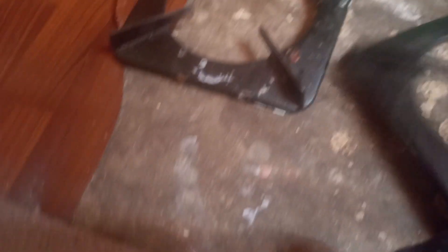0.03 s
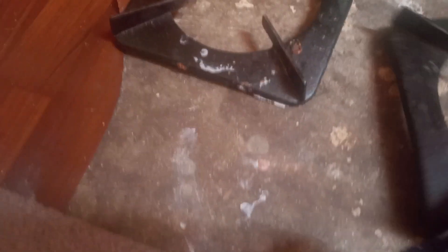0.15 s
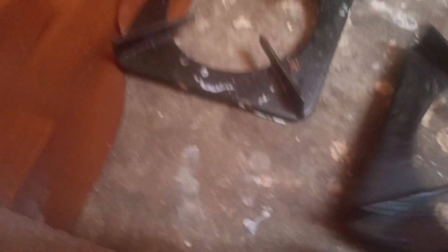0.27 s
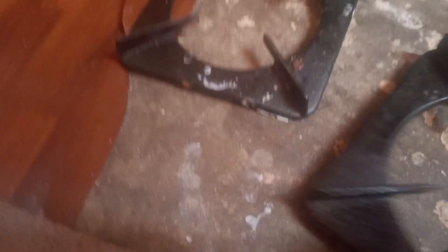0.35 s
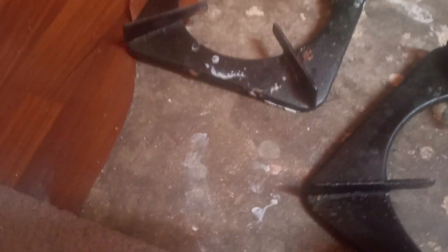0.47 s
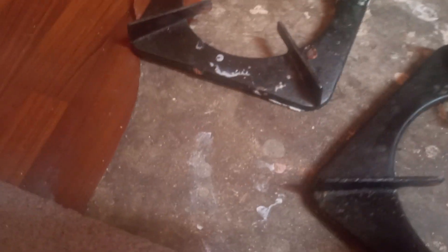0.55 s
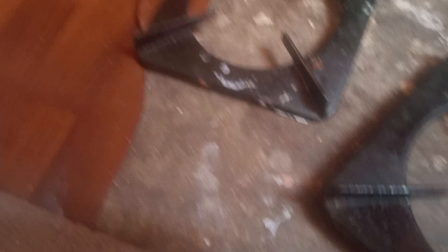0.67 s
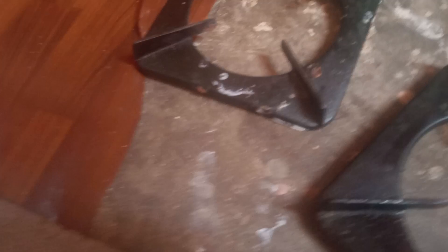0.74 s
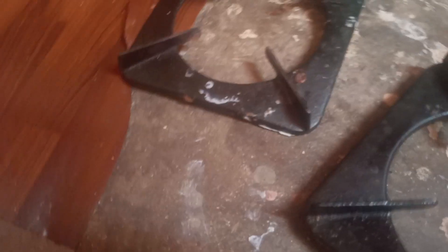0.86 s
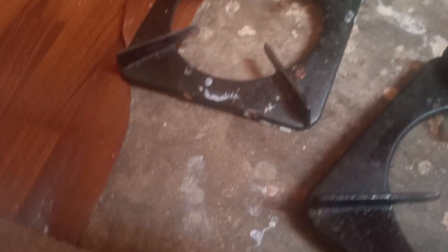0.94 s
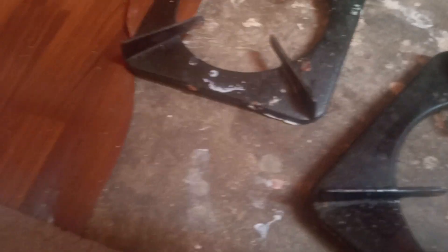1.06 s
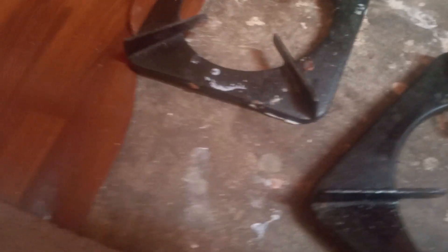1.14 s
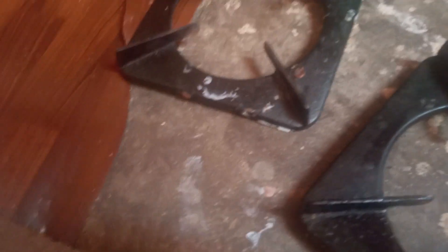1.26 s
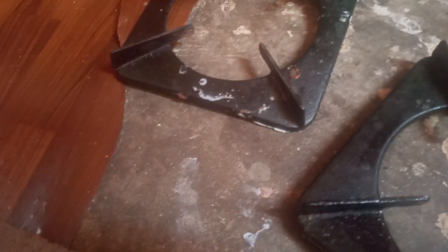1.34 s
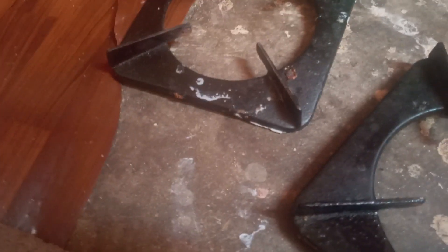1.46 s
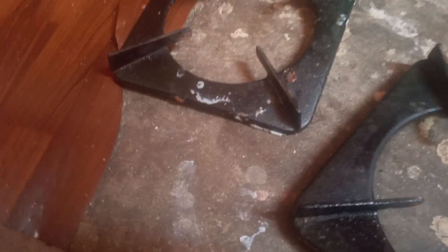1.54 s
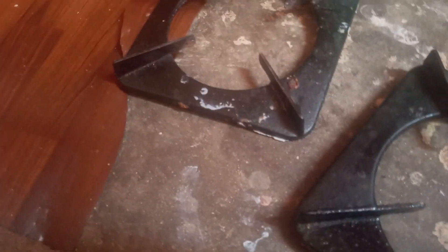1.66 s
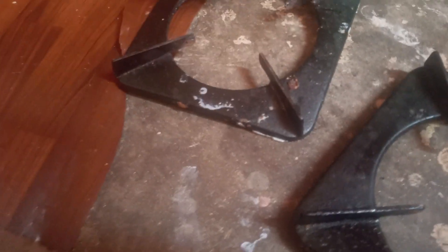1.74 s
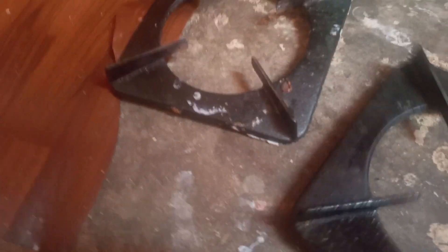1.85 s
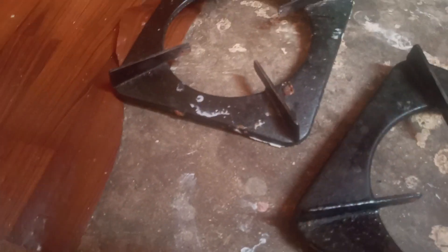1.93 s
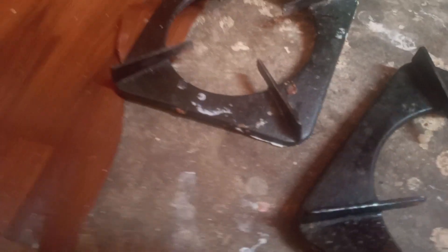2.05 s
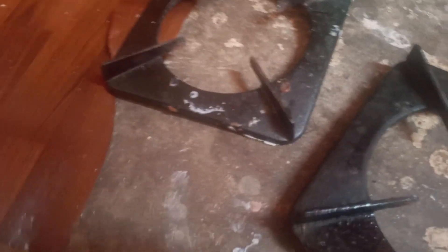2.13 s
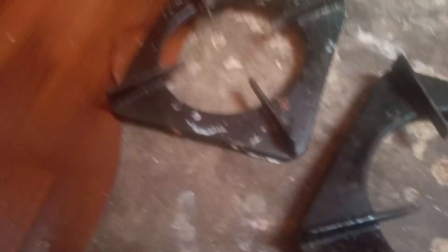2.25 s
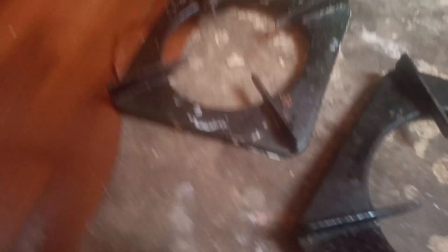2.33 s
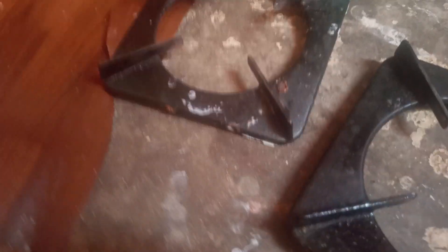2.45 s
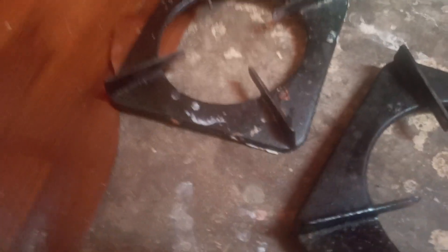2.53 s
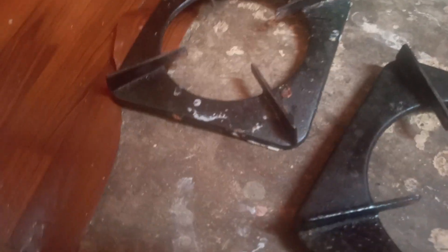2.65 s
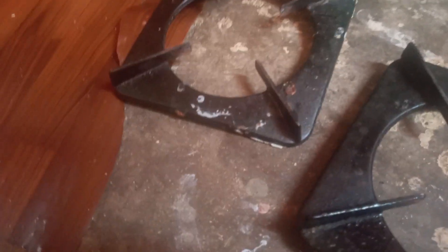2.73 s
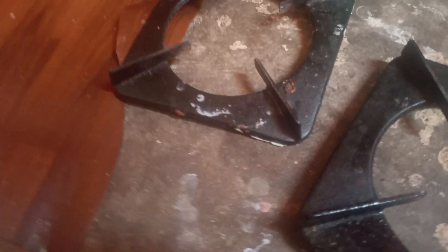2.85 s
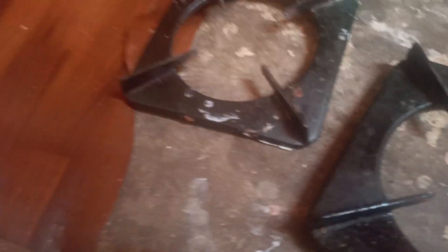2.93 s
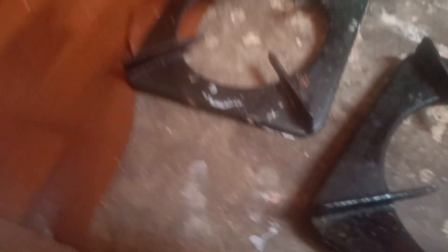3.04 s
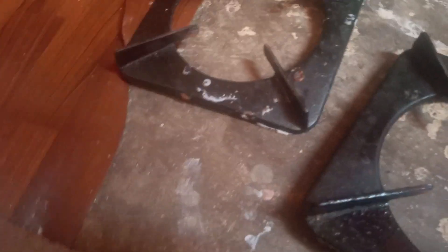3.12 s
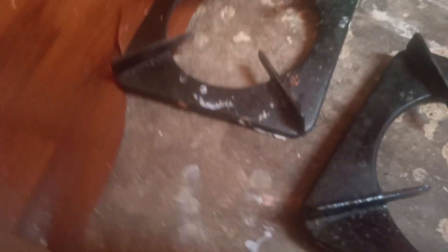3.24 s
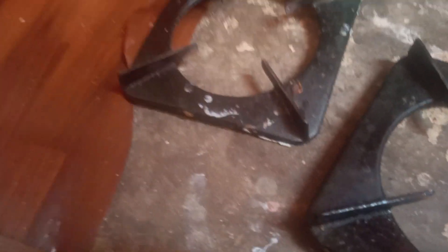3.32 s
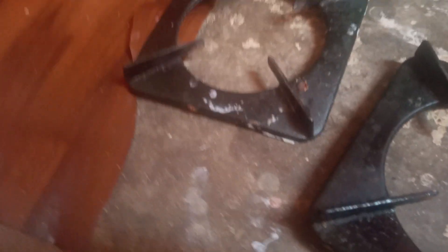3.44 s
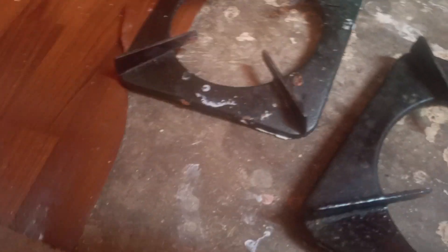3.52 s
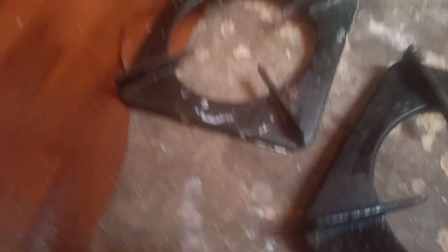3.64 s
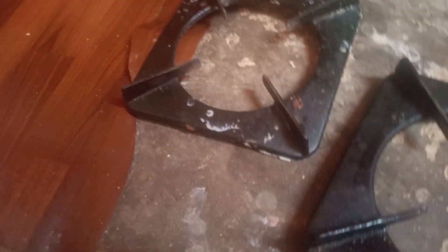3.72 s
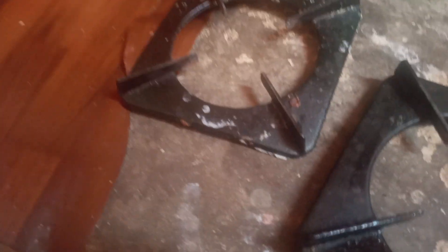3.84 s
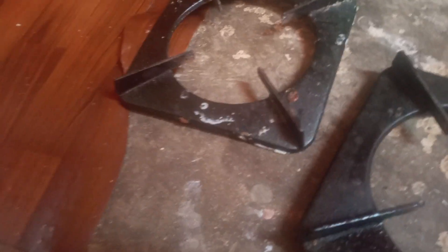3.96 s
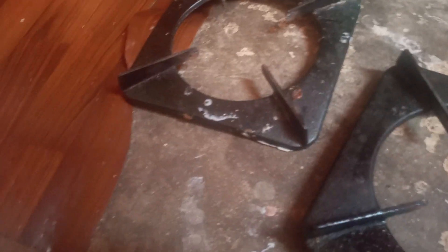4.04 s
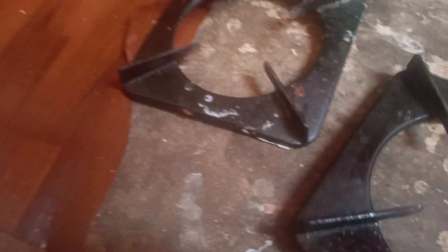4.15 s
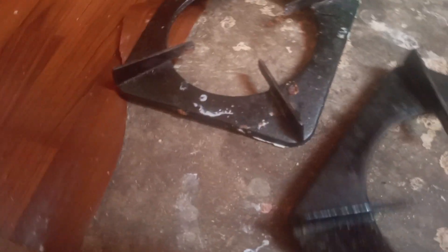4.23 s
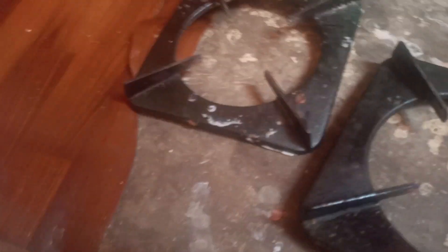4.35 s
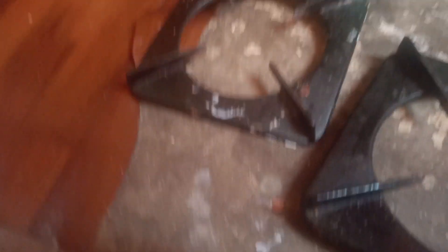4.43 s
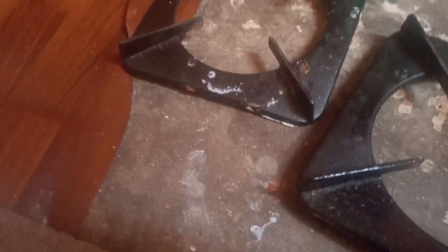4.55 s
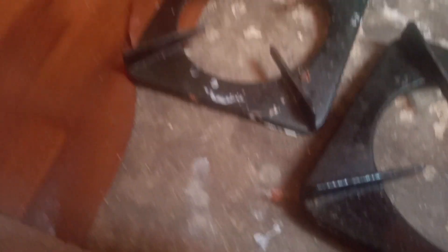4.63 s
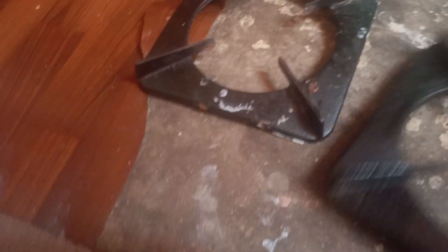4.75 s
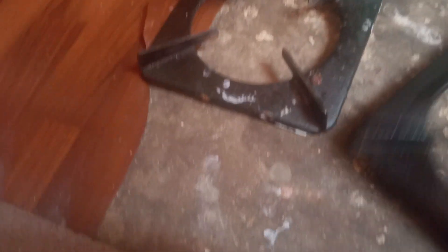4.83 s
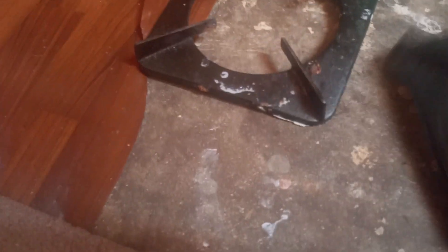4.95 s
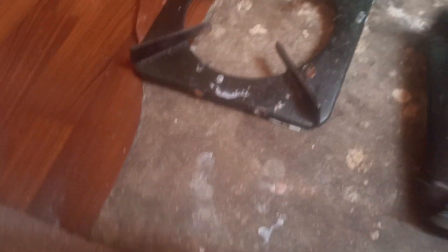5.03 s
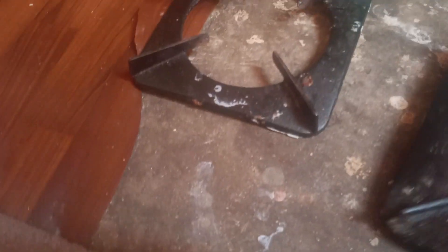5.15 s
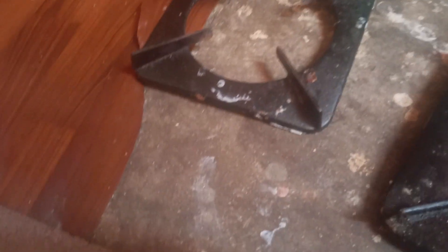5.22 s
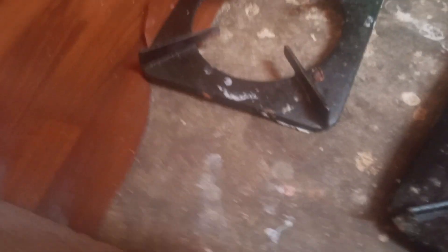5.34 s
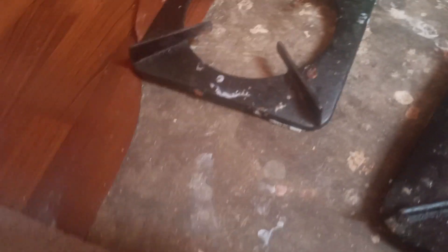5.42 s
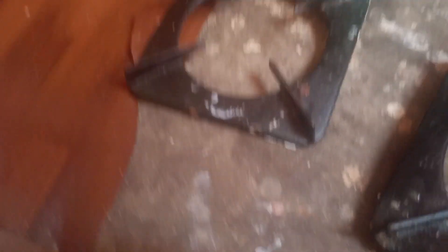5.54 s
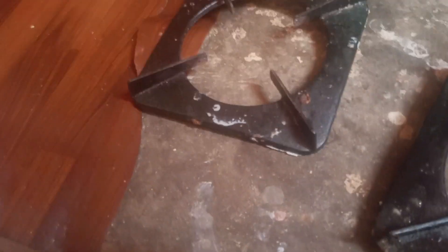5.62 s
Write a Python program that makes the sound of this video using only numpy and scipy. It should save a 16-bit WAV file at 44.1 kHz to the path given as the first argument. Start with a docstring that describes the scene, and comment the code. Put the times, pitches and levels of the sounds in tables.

```python
"""An iron pan support is dragged over a gritty hard floor, set down, scrubbed with a wet brush and dragged away.
Floor and brush excite the same modes of the iron with different strengths: sliding feet and faint handling rubs
by stick and slip, knocks by short bursts of contact, bristles by dense tiny slips that also hiss.
The close sound has a short dull echo; a low room rumble, a low tone and a faint hiss lie below."""
import sys
import numpy as np
from scipy import signal
from scipy.fft import rfft, irfft
from scipy.io import wavfile
from scipy.ndimage import uniform_filter1d

SR = 44100
rng = np.random.default_rng(int(sys.argv[2]) if len(sys.argv) > 2 else 0)


def digitize_waveform(pressure):
    """Quantize a signal to 16-bit integers and store it at the path in sys.argv[1].

    Rows of a 2-D input are taken as channels; values are limited to [-1, 1].
    """
    field = np.atleast_2d(pressure).T
    bounded = np.clip(field, -1, 1)
    quanta = np.round(bounded * 32767).astype(np.int16)
    wavfile.write(sys.argv[1], SR, quanta)


def elevation(decibels):
    """Turn decibel levels (scalar or array-like) into linear amplitude ratios."""
    levels = np.asarray(decibels, float)
    return 10 ** (levels / 20)


N = 250488
TIME = np.arange(N) / SR
BRUSH_OFF_S = 4.45   # the last stroke ends


def rms_one(x):
    """Normalisation: scale to unit rms."""
    return x / np.sqrt(np.mean(x ** 2) + 1e-20)


def in_time(rows):
    """Envelopes: columns of a table joined by straight lines in dB; silence outside it."""
    s, *columns = np.transpose(rows)
    return np.array([np.interp(TIME, s, column, left=-120, right=-120) for column in columns])


def drift(rate_hz):
    """Low-passed noise: a slow random wander of rms 1, drawn at every 40th sample."""
    r = np.exp(-80 * np.pi * rate_hz / SR)
    noise = rng.standard_normal(N // 40 + 2002)
    slow = signal.lfilter([1], [1, -2 * r, r * r], noise)[2000:]   # the filter has settled
    return np.interp(np.arange(N) / 40, np.arange(len(slow)), rms_one(slow))


def coloured(x, spectrum):
    """Spectral shaping: give x the spectrum of a (hz, level_db) table; white noise keeps its rms."""
    hz, level_db = np.transpose(spectrum)
    grid = np.log(np.fft.rfftfreq(N, 1 / SR) + 1)
    gain = rms_one(elevation(np.interp(grid, np.log(hz), level_db)))
    return irfft(rfft(x) * gain, N)


def patchy(x, low_hz, high_hz, patch_db, rate_hz):
    """Band modulation: seven overlapping bands of x swell and sink independently."""
    spectrum = rfft(x)
    grid = np.log(np.fft.rfftfreq(N, 1 / SR) + 1)
    centres = np.log(np.geomspace(low_hz, high_hz, 7))
    shares = [np.interp(grid, centres, row) for row in np.eye(7)]
    return sum(irfft(spectrum * share, N) * elevation(patch_db * drift(rate_hz)) for share in shares)


def resonance(x, hz, width_hz):
    """A damped mode: two-pole resonance of gain 1 on top."""
    r = np.exp(-np.pi * width_hz / SR)
    poles = [1, -2 * r * np.cos(2 * np.pi * hz / SR), r * r]
    return (1 - r * r) / 2 * signal.lfilter([1, 0, -1], poles, x + 1e-18)


def dips(x, rows):
    """Cancellation: subtracting a resonance cuts a narrow valley into x."""
    for hz, width_hz, depth in rows:
        x = x - depth * resonance(x, hz, width_hz)
    return x


def grains(per_s, spread_db, clump_db, clump_rate_hz):
    """Friction noise: tiny slips at random moments, of uneven size, coming in clumps; rms 1."""
    sizes = elevation(spread_db * np.minimum(rng.exponential(1, N), 5)) * rng.choice([-1, 1], N)
    slips = sizes * (rng.random(N) < per_s / SR)
    return rms_one(slips * elevation(clump_db * drift(clump_rate_hz)))


def rumble():
    """Room noise: a low murmur gathers at two modes and swells as the person shifts; a tone and a hiss join."""
    # spectrum of the murmur: hz, level_db (relative)
    murmur_spectrum = [(24, -40.5), (40, -2.5), (91, -1), (193, -10.5), (254, -6.5), (349, -16.5),
                       (418, -25), (500, -13.5), (650, -17.5), (1100, -120)]
    # swelling of the murmur: time_s, level_db
    swell = [(0.0, -52), (0.1, -52.5), (0.33, -57.5), (0.75, -52), (1.6, -54), (4.23, -57), (4.32, -49),
             (5.2, -48.5), (5.3, -50), (5.68, -58.5)]
    # room modes where the murmur gathers: hz, width_hz, level_db (relative)
    room_modes = [(72.2, 9.8, -0.5), (132, 21.5, 0.5)]
    # swells of the low tone: time_s, half_length_s, level_db
    tone_swells = [(0.162, 0.11, -40.5), (1.043, 0.19, -63), (2.7, .08, -60.5), (5.034, 0.22, -48.5)]
    # spectrum of the steady faint hiss: hz, level_db (relative)
    air_spectrum = [(180, -25), (300, -16.5), (994, -7), (1140, -13.5), (1360, -8), (1510, -11.5),
                    (4520, -16.5), (5340, -15.5), (6000, -19.5), (16000, -21)]
    noise = rng.standard_normal((4, N))
    modes = sum(elevation(level_db - 4.5) * rms_one(resonance(noise[1], hz, width_hz))
                for hz, width_hz, level_db in room_modes)
    murmur = patchy(coloured(noise[0], murmur_spectrum), 51, 660, 3.3, 3.1)
    low = elevation(in_time(swell)[0]) * (murmur + modes)
    swells = sum(elevation(level_db) * np.exp(-((TIME - s) / half_s) ** 2) for s, half_s, level_db in tone_swells)
    tone = (elevation(-71) + swells) * rms_one(resonance(noise[2], hz=305, width_hz=13))
    air = elevation(-57) * patchy(coloured(noise[3], air_spectrum), 400, 12000, 1.1, 3.3)
    return low + tone + air


def room(x):
    """Reverberation: dense echoes decay exponentially, dulled by the walls."""
    t60_s, first_echo_s, wall_cut_hz = 0.19, 0.006, 5600
    after_s = np.arange(SR // 2) / SR
    tail = rng.standard_normal(len(after_s)) * elevation(-60 * after_s / t60_s) * (after_s > first_echo_s)
    tail = signal.sosfilt(signal.butter(1, wall_cut_hz, fs=SR, output="sos"), tail)
    return signal.fftconvolve(x, tail / np.sqrt(np.sum(tail ** 2)))[:N]


def iron(forces, column, damping_hz, wander_db):
    """Modal synthesis: four forces ring the lowest, low, middle and high modes; the contact spot wanders."""
    # modes of the free iron: hz, width_hz, brush_db, floor_db (relative within a group)
    modes = [(509, 113, -19.5, -21), (614, 132, -25, -8), (695, 170, -22.5, -9), (838, 82, 3.5, -11),
             (1076, 320, -14.5, -14), (1201, 14, 4.5, -6.5), (1425, 105, 3.5, -5), (1554, 134, -4.5, -0.5),
             (1694, 60, -8.5, -1), (1831, 52, 9.5, -1.5), (2166, 190, -32, -12), (2308, 53, 1, -14),
             (2405, 14, -26, 11), (2500, 5, 1, 3.5), (2524, 13, 1, -3), (2925, 170, -7, -14.5),
             (3143, 23, -2.5, -11), (3292, 36, -1.5, -10.5), (3910, 50, 0.5, -12), (4635, 200, -4, 0),
             (5000, 31, -12, -29), (5720, 38, 5, 2), (5835, 21, -13.5, 1.5), (5866, 320, -3, -14),
             (6346, 140, -5, 4), (6750, 163, -2, 8), (7170, 330, -33, 2.5), (7700, 50, -4.5, -0.5),
             (8120, 170, -34, -1), (9070, 300, -14.5, -6), (9650, 58, -10.5, -27), (9760, 240, -10.5, -0.5),
             (11180, 580, -13, -6)]
    # borders between lowest, low, middle and high modes: hz
    group_edges = [1050, 1950, 4300]
    hz, width_hz, *strength_db = np.transpose(modes)
    width_hz = width_hz + damping_hz   # a hand or the floor widens every mode
    group = np.searchsorted(group_edges, hz)
    gain = elevation(strength_db[column])
    rings = np.zeros((4, N))
    for k in range(len(hz)):
        # white force of rms 1 makes each group ring at about rms 1
        total = np.sqrt(np.sum((gain ** 2 * width_hz)[group == group[k]]) * np.pi / SR)
        force = forces[group[k]] * elevation(wander_db * drift(5.87))
        rings[group[k]] += (-1) ** k * gain[k] / total * resonance(force, hz[k], width_hz[k])
    # the push that bends the heavy bars is soft and has little treble
    soft = signal.sosfilt(signal.butter(2, 5500, fs=SR, output="sos"), rings[:3].sum(axis=0))
    return soft + rings[3]


def strokes(turn_s, full_db, turn_db):
    """Friction level follows hand speed, highest just past the middle; bristles still rustle at the turn."""
    fastest_share, speed_power = 0.51, 1.71
    place = np.interp(TIME, [*turn_s, BRUSH_OFF_S], np.arange(len(turn_s) + 1.))
    share = (place % 1) ** (np.log(.5) / np.log(fastest_share))
    full = elevation(full_db)[np.minimum(place.astype(int), len(turn_s) - 1)]
    touching = (TIME > 1.24) & (TIME < 4.4)   # bristles stay on the iron
    level = full * np.sin(np.pi * share) ** speed_power + elevation(turn_db) * touching
    return uniform_filter1d(level, size=600)


def brush():
    """Friction excitation: dense bristle slips hiss and ring the iron."""
    # strokes: turn_s, full_speed_db, middle_modes_db, hiss_top_db (the last two relative)
    stroke_rows = [(1.102, -36.5, -4, 0.5), (1.339, -33.5, -5, -6), (1.52, -32, -1.5, 0.5),
                   (1.677, -28.5, -9, -6.5), (1.817, -29.5, -1, 3.5), (2.005, -33.5, -3.5, -1),
                   (2.143, -28, -7.5, 4), (2.313, -30, -9, -3.5), (2.545, -31.5, -5, 0.5),
                   (2.704, -29, -8, -1), (2.883, -34.5, -9, -2.5), (3.069, -32.5, -6.5, -1),
                   (3.228, -30.5, -10, 0), (3.408, -27.5, -8, -2), (3.568, -29.5, -5, 8),
                   (3.758, -32.5, -3, 3), (3.968, -27.5, -3, -1), (4.081, -29, -2.5, -1),
                   (4.255, -35.5, -4, 0)]
    # the brush presses the frame and wakes its low modes: time_s, level_db (relative)
    pressure = [(1.1, -61.5), (1.34, -45.5), (1.5, -40), (1.71, -47.5), (1.85, -63.5), (4.09, -61.5),
                (4.23, -41), (4.4, -60)]
    # spectrum of the bristle hiss: hz, level_db (relative)
    hiss_spectrum = [(590, -59), (1000, -26.5), (2050, -8.5), (2250, 0.5), (2650, -6.5), (3990, -10),
                     (4380, -9), (5740, -14), (7260, -13.5), (10800, -4.5), (13700, -16), (15400, -11),
                     (15900, -26), (16500, -47.5)]
    turn_s, full_db, middle_db, top_db = np.transpose(stroke_rows)
    centre_s = turn_s + np.diff(turn_s, append=BRUSH_OFF_S) / 2
    speed = strokes(turn_s, full_db, turn_db=-47)
    top_speed = strokes(turn_s, full_db, turn_db=-60)   # the top of the hiss nearly stops at the turn
    middle = elevation(np.interp(TIME, centre_s, middle_db))
    top = elevation(np.interp(TIME, centre_s, top_db))

    slips = grains(12000., 2.0, 1.53, 22.0)
    low = elevation(in_time(pressure)[0])
    forces = [elevation(-5.0) * low * slips, low * slips, middle * speed * slips, elevation(-5.0) * speed * slips]
    ring = iron(forces, column=0, damping_hz=4.5, wander_db=4.0)

    hiss = patchy(coloured(grains(14000., 1.9, 3.3, 48.0), hiss_spectrum), 2700, 12000, 1.0, 14.0)
    dull = signal.sosfiltfilt(signal.butter(2, 9000, fs=SR, output="sos"), hiss)
    return ring + elevation(-3.0) * (speed * dull + top_speed * top * (hiss - dull))


def levels(middle_db, lowest_db, low_db, high_db):
    """Modal excitation: force on the lowest, low, middle and high modes, given relative to the middle ones."""
    return elevation(np.array([middle_db + lowest_db, middle_db + low_db, middle_db, middle_db + high_db]))


def lifted(s):
    """Support condition: whether the frame is lifted, tapping and faintly rubbing."""
    # lifted spans: start_s, end_s
    spans = [(.6, 1.1), (4.6, 4.76), (5.5, 5.68)]
    return any(start_s < s < end_s for start_s, end_s in spans)


def low_share_db(s):
    """Contact geometry: a frame tipped by strokes lands flat and sounds low; a dragged one only hops."""
    # each pair: lowest modes, low modes
    if lifted(s):
        return -5, -8
    if 1.1 < s < 4.3:   # scrubbed
        return -12.5, -5.5
    return -25.5, -12


def sliding():
    """Stick-slip: scrapes and faint handling rubs push all modes and stutter on the middle ones."""
    # one table for each slide or faint handling rub:
    # time_s, scrape_db, low_modes_db, high_modes_db (the last two relative)
    slides = [
        [(0.0, -16.5, -7, -9.5), (0.1, -19.5, -5, -10), (0.18, -21, -4, -3), (0.21, -12, -15, -24.5),
         (0.255, -25, -6, -8), (0.31, -18, -9.5, -16.5), (0.39, -12, -7, -13), (0.44, -15, -10, -17.5),
         (0.47, -29.5, -6, -11.5), (0.6, -81, 0, -20)],
        [(0.86, -63.5, -10, -2), (0.938, -52, -8, 0.5), (0.972, -44.5, -7, 3)],
        [(4.29, -34, -11, -9), (4.335, -20, -5.5, -21), (4.36, -10, -8, -18), (4.405, -23, -7.5, -18),
         (4.458, -71, -11, 10), (4.52, -59, -11, 0)],
        [(4.775, -50, -12, 3), (4.804, -17.5, -8, -13), (4.834, -27, -6.5, -3.5), (4.89, -27, -8, -14),
         (4.92, -15, -6, -13), (5.03, -19.5, -6, -15.5), (5.06, -15.5, -7, -10.5), (5.12, -19, -5.5, -15),
         (5.17, -15, -9.5, -24), (5.26, -22.5, -8.5, -12.5), (5.4, -94, -2, -14)],
        [(5.38, -78, -10, 0), (5.56, -55, -9, -5), (5.6, -50.5, -1, -5), (5.65, -53, -7, -4.5),
         (5.68, -75, -9, 1)],
    ]
    # lowest modes relative to the low ones, for each slide or rub: level_db
    slide_lowest = [-1.5, 3, -8, -4.5, -7]
    force = sum(levels(scrape_db, low_db + lowest_db, low_db, high_db)
                for (scrape_db, low_db, high_db), lowest_db in zip(map(in_time, slides), slide_lowest))
    stutter_db, stutter_rate_hz = 3.5, 65
    force[2] *= rms_one(elevation(stutter_db * np.tanh(drift(stutter_rate_hz))))
    return force


def knocks(rows, rise_ms, strike_db):
    """Impact: a knock is a short burst of contact force that rises and dies exponentially."""
    force = np.zeros((4, N))
    after_ms = np.arange(SR // 8) / SR * 1000
    for s, level_db, high_db, decay_ms in rows:
        shape = (1 - np.exp(-after_ms / rise_ms)) * np.exp(-after_ms / decay_ms)
        shape[round(rise_ms * SR / 1000)] += elevation(strike_db)   # the hardest touch
        burst = levels(level_db, *low_share_db(s), high_db)[:, None] * shape
        start = round(s * SR)
        force[:, start:start + len(shape)] += burst[:, :N - start]
    return force * elevation(np.array([[-8.0], [-2.5], [-1.5], [-6.0]]))   # balance of the four mode groups


def feet():
    """Contact excitation: feet stutter over grit; knocks ring freely if lifted, short and softer if pressed."""
    # knocks on the floor: time_s, level_db (relative), high_modes_db (relative), decay_ms
    knock_rows = [(0.089, -14, 3, 10.6), (0.194, -13, -30, 17), (0.2914, -6, -9.5, 8.6),
                  (0.3187, -19, -16, 4.7), (0.356, -16.5, -26, 3.6), (0.382, -8, 2, 3.9),
                  (0.408, -13, -27, 5), (0.4268, -6.5, -36, 8), (0.732, -17.5, -30, 7.8),
                  (0.9415, -48, 6, 6), (0.96, -50, 8, 2), (0.9798, -7, -23, 7), (0.993, -27.5, -8, 24),
                  (1.066, -22.5, -29, 3.8), (1.3225, -17.5, -12.5, 7.2), (1.607, -16.5, -28, 4.5),
                  (1.642, -17, -28, 11), (1.9265, -8, -22, 4.4), (1.938, -7, -18.5, 10.5),
                  (1.944, -10, -20, 9.2), (1.9678, -12, -1, 5.3), (2.143, -15.5, -26, 3.7),
                  (2.248, -6, -26, 7.7), (2.2586, -5.5, -21, 3.6), (2.8612, -7, -7.5, 2.3),
                  (3.7192, -12, -11, 16), (3.7505, -11.5, -17, 11.4), (4.189, -6, -12, 10.1),
                  (4.1955, -2, -23, 6.4), (4.211, -4.5, -17, 3.2), (4.349, -8, -12, 3.7),
                  (4.7016, -15, -10.5, 2.6), (4.7132, -29.5, 0, 12), (4.7295, -17.5, -0.5, 6.6),
                  (4.801, -5.5, -16, 3.8), (4.8731, -10, -24.5, 6), (4.9017, -10.5, -7, 13),
                  (4.95, -8, -15, 5), (4.972, -12.5, -16, 6.9), (5.0018, -4, -26, 6), (5.0288, -7, -21, 5),
                  (5.0502, -7.5, -14, 12), (5.1444, 2.5, -24, 3.9), (5.2418, -7, -26, 5.4),
                  (5.5727, -22.5, -20.5, 4.7), (5.613, -35, -25, 7.8)]
    # dull resonances of the floor itself: hz, width_hz, level_db (relative)
    slab = [(645, 226, -7), (1168, 350, -5.5), (1770, 440, 0), (2180, 620, 11), (3110, 1330, -3.5)]
    # spectrum of the grit hiss: hz, level_db (relative)
    grit_spectrum = [(2470, -28.5), (4200, -2.5), (5470, -28), (6910, -12), (8890, -19), (11100, -4),
                     (12800, -33.5), (15400, -27), (16200, -47), (16500, -71)]
    # neighbouring modes cancel here when the feet are pushed: hz, width_hz, depth (0-1)
    cancelling = [(1177, 65, 0.8), (2660, 51, 0.8)]
    slide = sliding() * elevation(-1.5)
    held = knocks([row for row in knock_rows if not lifted(row[0])], rise_ms=4.3, strike_db=-1.0) * elevation(2.5)
    free = knocks([row for row in knock_rows if lifted(row[0])], rise_ms=0.22, strike_db=16.5)
    contact = rng.choice([-1., 1.], N)   # rough contact of even strength
    loose = slide * grains(4000., 2.97, 1.52, 58.0) + free * contact
    pressed = held * contact
    ring = iron(loose, column=1, damping_hz=18.0, wander_db=1.5)
    ring = ring + iron(pressed, column=1, damping_hz=55, wander_db=2.0)

    push = loose[1] + pressed[1]
    thud = sum((-1) ** k * elevation(level_db + 7.5) * resonance(resonance(push, hz, width_hz), hz, width_hz)
               for k, (hz, width_hz, level_db) in enumerate(slab))
    grit = patchy(coloured(grains(8100.0, 3.4, 7.4, 26.0), grit_spectrum), 4100, 12130, 7.8, 10.0)
    return dips(ring + thud, cancelling) + elevation(-7.0) * (slide + held + free)[3] * grit


def scene():
    """Superposition: brush and feet close by, their echo, the background."""
    close = brush() + feet()
    echo = elevation(-16) * room(close)
    return (close + echo + rumble())[None]


def roll_off(x):
    """The treble ends steeply here."""
    return signal.sosfilt(signal.butter(12, 16990, fs=SR, output="sos"), x)


def record(dry):
    """Transducer response: the microphone has two dips, no deep bass, rounded peaks and a cut top."""
    # dips of the microphone: hz, width_hz, depth (0-1)
    microphone_dips = [(4300, 1140, 0.82), (13750, 1100, .7)]
    bass_cut_hz, top_hz = 75, 15720
    dipped = dips(dry, microphone_dips)
    thinned = signal.sosfilt(signal.butter(3, bass_cut_hz, "high", fs=SR, output="sos"), dipped)
    rounded = .8 * np.tanh(thinned / .8)
    mix = signal.sosfilt(signal.ellip(12, .5, 70, top_hz, fs=SR, output="sos"), rounded)
    return roll_off(mix)


dry = scene()
out = record(dry)
digitize_waveform(out)
```